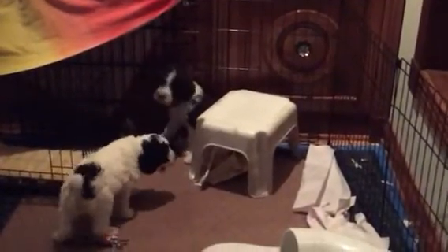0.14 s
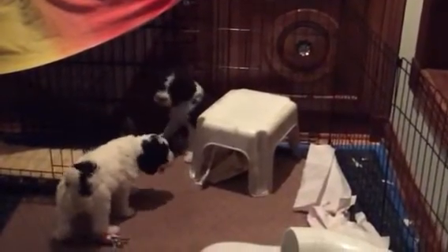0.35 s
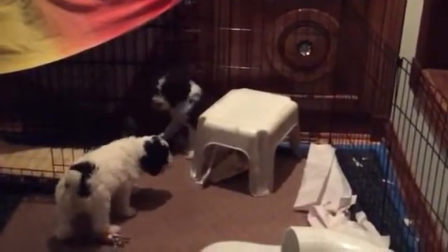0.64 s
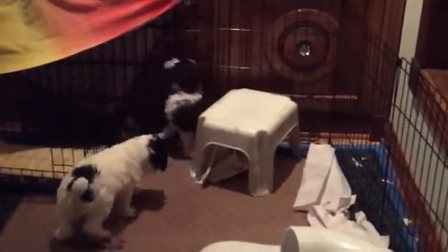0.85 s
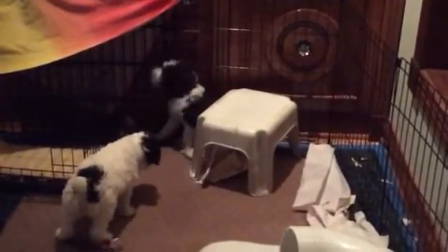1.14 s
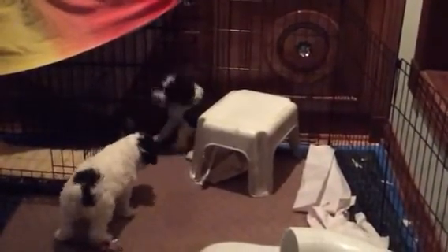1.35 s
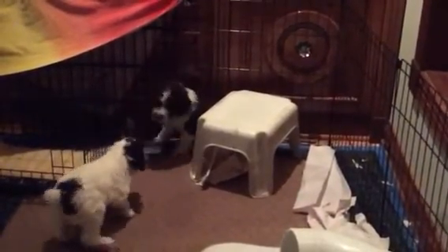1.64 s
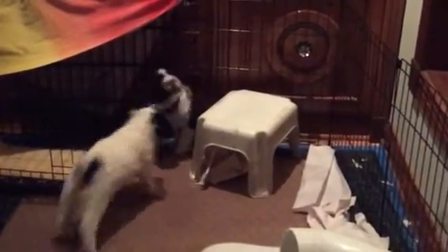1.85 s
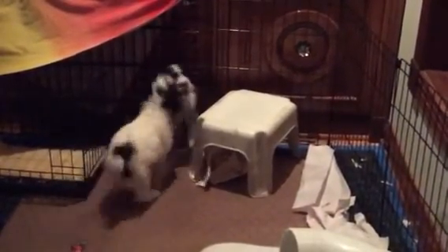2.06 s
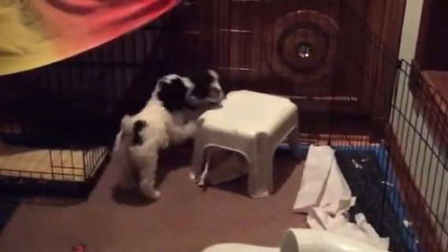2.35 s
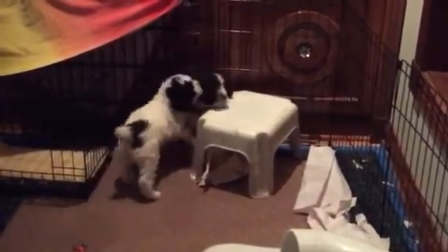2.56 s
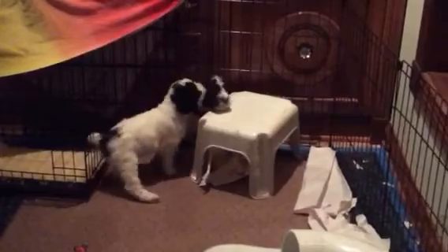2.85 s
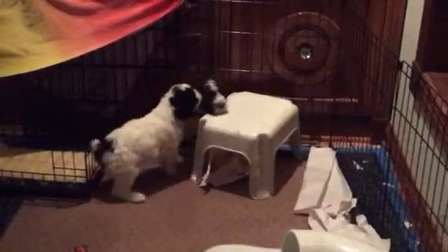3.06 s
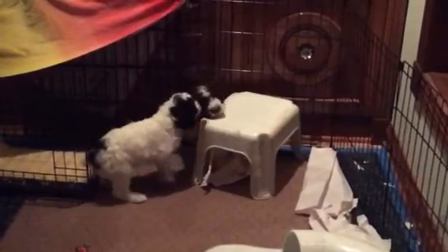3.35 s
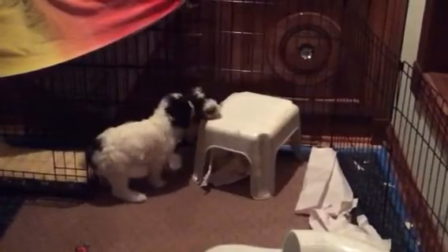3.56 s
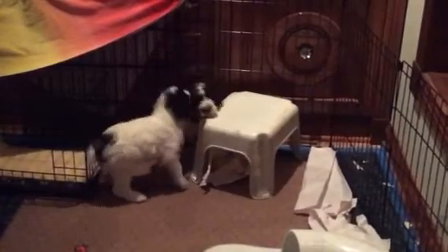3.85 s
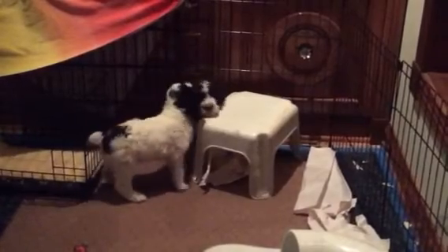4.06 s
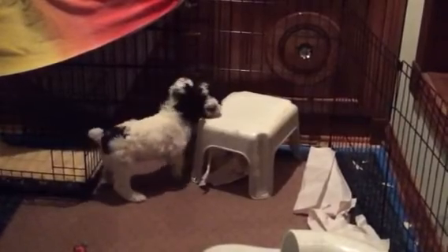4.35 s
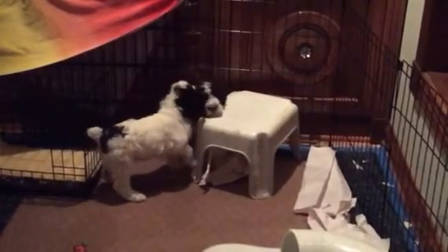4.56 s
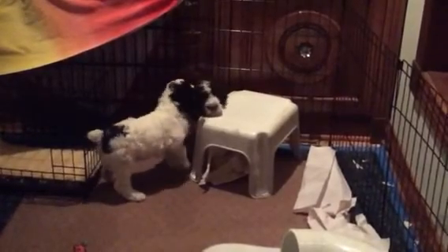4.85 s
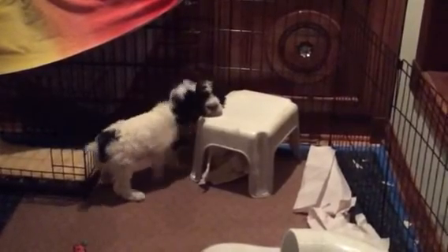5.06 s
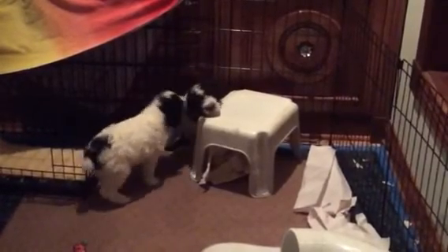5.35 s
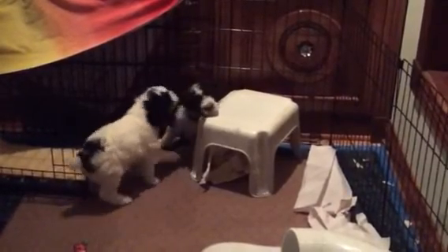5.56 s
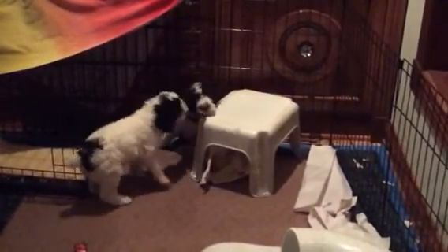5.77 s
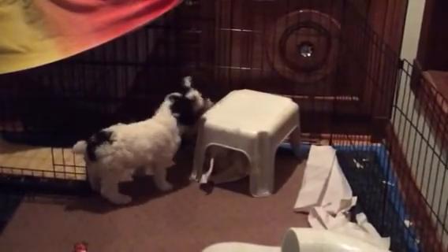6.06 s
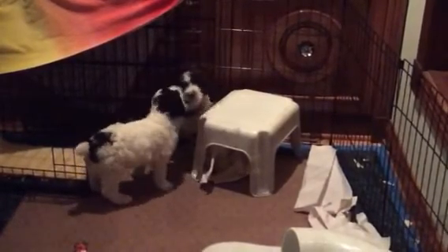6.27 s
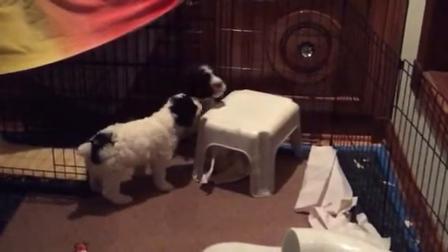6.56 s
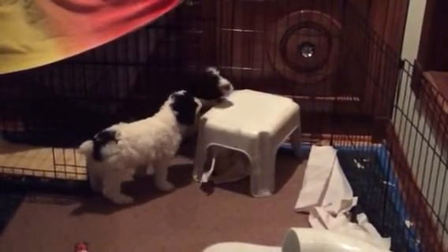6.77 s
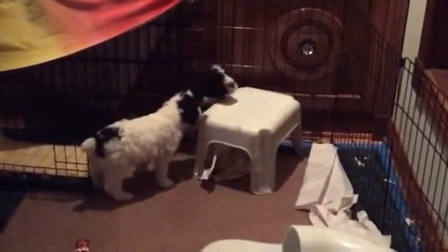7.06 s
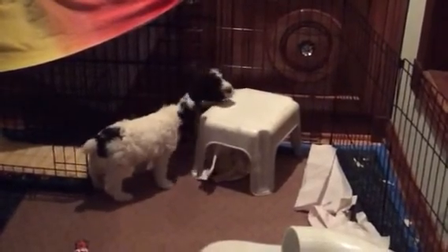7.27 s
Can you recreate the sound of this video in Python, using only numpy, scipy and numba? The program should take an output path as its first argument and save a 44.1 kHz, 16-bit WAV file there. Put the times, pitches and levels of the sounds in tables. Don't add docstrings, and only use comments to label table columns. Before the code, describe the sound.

A puppy gives one rough falling yap, then a short hoarse bark, followed by low fluttering grunts, claw ticks and rustling paws in a small room.

```python
import sys
import numpy as np
from scipy import signal
from scipy.fft import rfft, irfft
from scipy.io import wavfile
from scipy.ndimage import uniform_filter1d
from numba import njit

SR = 44100
rng = np.random.default_rng(int(sys.argv[2]) if len(sys.argv) > 2 else 0)


def nominal_scale(level):
    x = np.asarray(level, float) / 20
    return 10 ** x


def wrap_up_sound(samples):
    columns = np.atleast_2d(samples).T
    tamed = np.clip(columns, -1, 1)
    steps = np.round(tamed * 32767).astype(np.int16)
    wavfile.write(sys.argv[1], SR, steps)


N = 327206
T = np.arange(N) / SR


def unit(x):
    return x / np.sqrt(np.mean(x ** 2))


@njit
def svf(x, hz, width):
    y, band_state, low_state = np.empty(len(x)), 0., 0.
    for i in range(len(x)):
        g, k = np.tan(np.pi * hz[i] / SR), width / hz[i]
        v = (band_state + g * (x[i] - low_state)) / (1 + g * (g + k))
        band_state = 2 * v - band_state
        low_state += 2 * g * v
        y[i] = k * v
    return y


def band(x, hz, width):
    hz = hz + np.zeros(N)
    return svf(svf(x, hz, 1.5 * width), hz, 1.5 * width)


def tract(x, modes):
    total = np.zeros(N)
    for k, (hz, width, db) in enumerate(modes):
        total = total + (-1) ** k * nominal_scale(db) * band(x, hz, width)
    return unit(total)


def walk(rate):
    k = int(SR / rate)
    steps = np.repeat(rng.standard_normal(N // k + 1), k)
    return 2.1 * uniform_filter1d(uniform_filter1d(steps, k), k)[:N]


@njit
def folds(hz, jitter, shimmer, chance):
    pulses, phase, p, k = np.zeros(len(hz) + 1), np.empty(len(hz)), 0., 0
    for i in range(len(hz)):
        step = hz[i] * np.exp(jitter[i] * chance[k, 0]) / SR
        p += step
        if p >= 1:
            p, k = p - 1, k + 1
            size = np.exp(shimmer[i] * chance[k, 1]) / np.sqrt(step)
            pulses[i] += size * p / step
            pulses[i + 1] += size * (1 - p / step)
        phase[i] = p
    return pulses[:-1], phase


def pushes(s, hold, db, rise_db_s, sag_db_s, fall_db_s):
    age = T - s
    rise_db = rise_db_s * np.maximum(-age, 0)
    sag_db = sag_db_s * np.clip(age, 0, hold)
    fall_db = fall_db_s * np.maximum(age - hold, 0)
    return nominal_scale(db - np.minimum(rise_db + sag_db + fall_db, 120)), age


# f/Hz, level/dB
HUM = [(120, -90.5), (240, -77.5), (1200, -87.5), (1680, -89.5), (1920, -103.5), (2160, -92.5),
       (2400, -101.5), (3600, -97.5)]
# f/Hz, density/dB per Hz
AIR = [(15, -54.5), (25, -13), (75, -2.5), (183, 3), (209, -17), (233, -7), (267, -18), (368, -7),
       (826, -15), (1240, -19.5), (2300, -30.5), (3930, -23), (5280, -35), (9550, -22), (15500, -27)]


def air():
    hz, db = np.transpose(AIR)
    bins = np.arange(N // 2 + 1) * SR / N + 1
    colour = nominal_scale(np.interp(np.log(bins), np.log(hz), db))
    noise = irfft(rfft(rng.standard_normal(N)) * colour, N)
    flicker_db = .6 * walk(8)
    hum = sum(np.sqrt(2) * nominal_scale(line_db) * np.sin(2 * np.pi * f * T) for f, line_db in HUM)
    return unit(noise) * nominal_scale(-71.5 + flicker_db) + hum


# start t/s, length/s, f/Hz, level/dB, width/Hz
WHINES = [(-.04, 0.088, 2060, -65, 150), (.55, .08, 5500, -80, 400), (.55, .07, 6800, -82, 500),
          (0.751, 0.038, 3030, -42.5, 350), (1.37, 0.07, 1760, -71, 130), (1.43, .04, 1760, -76, 130),
          (1.54, 0.065, 1804, -75, 120), (3.261, 0.049, 2080, -68.5, 220), (3.33, .1, 1450, -73, 300),
          (3.46, .08, 3300, -73, 300), (3.63, .05, 1750, -69, 250), (3.71, .05, 1400, -72, 250),
          (3.77, .06, 1700, -74, 200), (4.31, .06, 290, -67, 60), (4.94, 0.087, 1000, -66.5, 219),
          (4.992, 0.14, 900, -70, 130), (5.382, 0.18, 996, -68, 50), (5.7, .07, 1250, -68, 400),
          (5.982, 0.16, 925, -72, 45), (6.099, 0.12, 2040, -65.5, 221), (6.14, 0.049, 1720, -73, 150),
          (6.26, .07, 1200, -72, 120)]


def whines():
    pure_hz = 75
    noise = rng.standard_normal(N)
    waver = 2 * np.pi * np.cumsum(1 + .012 * walk(25)) / SR
    out = np.zeros(N)
    for s, length, hz, db, width in WHINES:
        swell = np.sin(np.pi * np.clip((T - s) / length, 0, 1)) ** 0.95
        pure = np.clip(1 - width / pure_hz, 0, .9)
        tone = pure * np.sqrt(2) * np.sin(hz * waver)
        breath = np.sqrt(1 - pure ** 2) * tract(noise, [(hz, width, 0)])
        out += nominal_scale(db) * swell * (tone + breath)
    return out


# loudest t/s, swell/s and fade/s for 20 dB, hiss level/dB, rasp against hiss/dB
SCUFFS = [(.005, .05, 0.052, -82, 20), (.552, .01, 0.16, -74, -14), (.835, 0.059, 0.42, -59, 0),
          (1.06, .04, 0.12, -59.5, -1), (1.32, 0.39, 0.27, -76.5, 2), (1.56, 0.16, 0.13, -78.5, 0.5),
          (1.82, 0.23, 0.17, -70, 0), (1.905, 0.15, 0.13, -63, 6), (2.016, 0.14, 0.22, -58, 3),
          (2.099, 0.19, 0.07, -60.5, 5), (2.184, 0.021, 0.043, -54, 6), (2.244, 0.013, .05, -52, -5),
          (2.419, 0.071, 0.13, -58, 6), (2.771, 0.16, 0.21, -73, 4), (3.049, 0.12, 0.38, -80, 9.5),
          (3.52, 0.22, 0.37, -80.5, 7), (3.931, 0.28, 0.33, -81.5, 6.5), (5.41, 0.4, 0.34, -86, 10),
          (5.819, 0.27, .3, -69, 1), (5.97, 0.36, 0.18, -66, 0.5), (6.16, 0.048, 0.11, -81, 13),
          (6.49, 0.23, 0.17, -72.5, 1.5), (6.69, 0.023, 0.11, -70, -4), (6.88, 0.67, 0.55, -77, 2),
          (7.361, 0.27, 0.53, -71, 3)]
# heaviest t/s, swell and fade/s for 20 dB, level/dB
SHIFTS = [(.45, 7, -87), (1.15, 0.1, -69.5), (1.75, 1.8, -80.5), (2.62, 1.1, -79), (3.4, -0.5, -73),
          (3.9, 0.74, -70.5), (4.4, 1.5, -82.5), (4.7, 1.1, -72.5), (5.25, 1.5, -74), (5.5, -0.2, -69),
          (5.731, 0.14, -67.5), (6.3, 0.5, -74), (6.65, 1, -74), (7.0, 0.9, -71)]


def scuffing():
    rest_hiss_db, rest_rasp_db, rest_weight_db = -88, -80.5, -84.5
    weight_db = -14
    s, swell, fade, db, rasp_db = np.array(SCUFFS, float).T[:, :, None]
    rise_db_s, fall_db_s = 20 / np.maximum(swell, .005), 20 / np.maximum(fade, .005)
    gain = pushes(s, 0 * s, db, rise_db_s, 0 * s, fall_db_s)[0]
    rub = np.max(gain * nominal_scale(rasp_db), axis=0)
    grains = rng.standard_normal(N) * nominal_scale(1.5 * rng.exponential(size=N) + .9 * walk(60))
    fur = tract(grains, [(7020, 9100, -21), (10160, 3900, 12.5), (12750, 12000, 8.5)])
    mat = tract(grains, [(1404, 2290, -2.3), (2600, 3020, 2), (3960, 4710, -2)])
    hiss = (gain.max(axis=0) + nominal_scale(rest_hiss_db)) * fur
    rasp = (rub + nominal_scale(rest_rasp_db)) * mat

    s, span, db = np.array(SHIFTS, float).T[:, :, None]
    slope = 20 / np.maximum(span, .02)
    shifting = pushes(s, 0 * s, db, slope, 0 * s, slope)[0].max(axis=0)
    load = nominal_scale(weight_db) * rub + nominal_scale(rest_weight_db) + shifting
    bedding = tract(rng.standard_normal(N), [(223.0, 130, 9.0), (484.0, 200, -6.0), (900, 390, 0.0)])
    weight = load * nominal_scale(2 * walk(30)) * bedding
    return hiss + rasp + weight


# full at t/s, chest level/dB, chest f/Hz, mouth level/dB, nose level/dB
HUFFS = [(.015, -64, 174.2, -21, -19), (2.738, -61.5, 183.8, -12, -28), (3.31, -63, 192.8, -9, -17),
         (3.815, -62, 190.1, -20, -10), (4.35, -68, 189.6, -10, -9), (2.238, -55, 169.9, -29.5, -21),
         (4.278, -60, 185.1, -14, -9), (4.545, -61, 189, -24, -4.5), (4.838, -57.5, 157.9, -22.5, -4),
         (5.125, -58, 173.5, -32, -5.5), (5.662, -57, 167.1, -10.5, -15), (6.135, -65.5, 178.6, -7, -8),
         (6.53, -48, 184.7, -14, -7), (6.6, -63.5, 189.8, -20, -7), (5.47, -63, 187, -13.5, -8),
         (2.555, -59.5, 183.7, -15, -8)]
# full at t/s, hold/s, chest level/dB, chest f/Hz, mouth level/dB
GRUNTS = [(2.092, .02, -49, 153.1, -9), (2.403, .022, -43, 185.1, -4.5), (2.434, .02, -47, 169.9, 6.5),
          (2.47, 0.023, -42, 187.9, -3), (2.506, 0.01996, -48, 183.9, -17), (2.997, .025, -47, 164.2, -16),
          (3.03, .035, -44.5, 172.1, -4.5), (3.071, .09, -41.5, 183.3, -12.5),
          (3.185, .075, -50, 191.7, -14.5), (3.49, .05, -42, 177, -14.5), (3.562, .085, -48, 175.2, -14.5),
          (4.023, .01, -60, 190.2, -14), (4.055, .01, -54, 165, -30), (4.078, .02, -45.5, 165.9, -32),
          (4.112, .02, -53, 155, -30), (4.14, .03, -51, 163.5, -29), (4.176, .055, -47.5, 175.7, -15.5),
          (4.257, .02, -60, 174.7, -15.5), (5.312, .01, -58, 187.5, -16.5), (5.34, .018, -44, 180.2, -16),
          (5.365, .032, -42, 180.1, -10.5), (5.408, .015, -48, 182.4, -13),
          (6.402, .045, -48, 160.4, -10.5), (6.459, .04, -47, 168.3, -10.5), (6.505, .03, -43, 176, -16),
          (7.409, .03, -37.5, 174.6, -14.5)]
# t/s, f/Hz, level against the chest tone/dB, nose opening/dB
SIDES = [(2.1, 224.5, -6, 0.5), (2.42, 244.5, -4.5, -3.5), (2.49, 245, -5, 2.5), (3.0, 222, -7.5, -5),
         (3.16, 236.7, -4.5, -4.5), (3.22, 250.6, -2.5, 2), (3.5, 233.9, -9.5, -0.5), (3.63, 239.9, -1, -1),
         (4.07, 239, -8.5, 4), (4.14, 235.9, -8.5, -1), (4.2, 225.6, -7.5, 1.5), (5.34, 234.1, -3.5, -8),
         (5.42, 235.1, -6.5, -1), (6.4, 227, -4.5, -2), (6.46, 249.8, -1.3, -0.5), (6.541, 251.7, -4.5, 3),
         (7.4, 238.8, -11, -5.5)]
# f/Hz, width/Hz, level/dB
NOSE = [(294, 90, 6), (427, 80, 3), (534, 40, 7), (606, 80, 3), (790, 130, -6)]
# f/Hz, width/Hz, level/dB
SHUT_MOUTH = [(1035, 140, 1.5), (1290, 190, -0.65), (1550, 300, -10.5), (1920, 170, -14),
              (2360, 400, -21.5), (3400, 530, -25.5)]


def grunts():
    huff_s, glide_hz_s = .02, 39.81
    rise_db_s, sag_db_s, fall_db_s = 600, 10.5, 750
    nose_db, nose_share, nose_rise_db_s = -8, 0.53, 54.5
    lips_lag_db_s, round_s = 199.5, 0.021
    rows = [(*row, nose_db + nose_share * row[-1]) for row in GRUNTS]
    rows += [(s, huff_s, *rest) for s, *rest in HUFFS]
    s, hold, db, hz, lips_db, nostril_db = np.array(rows, float).T[:, :, None]
    gain, age = pushes(s, hold, db, rise_db_s, sag_db_s, fall_db_s)
    age = np.clip(age, -.03, hold + .04)

    def loudest(part_db):
        return uniform_filter1d(np.max(gain * nominal_scale(part_db), axis=0), int(round_s * SR))

    push_hz = hz + glide_hz_s * (age - hold / 2)
    chest_hz = np.sum(gain * push_hz, axis=0) / gain.sum(axis=0)
    side_s, *columns = np.transpose(SIDES)
    side_hz, side_db, open_db = (np.interp(T, side_s, c) for c in columns)

    steady = np.ones(N)
    flap_hz = np.clip(side_hz - chest_hz, 45, 95)
    pulses, phase = folds(flap_hz, .07 * steady, .2 * steady, rng.standard_normal((N // 100, 2)))
    flaps = unit(pulses)
    breath = unit(np.exp(-phase / .55) * rng.standard_normal(N))

    turn = 2 * np.pi * np.cumsum(chest_hz * (1 + .024 * walk(110))) / SR
    flap_turn = 2 * np.pi * phase
    chest = nominal_scale(1.3 * walk(50)) * np.sin(turn) + nominal_scale(-24) * np.sin(turn - flap_turn)
    side = nominal_scale(side_db + 1.8 * walk(50)) * np.sin(turn + flap_turn)
    nose_gain = nominal_scale(open_db) * loudest(nostril_db + nose_rise_db_s * age)
    nose = nose_gain * tract(flaps + 1.3 * breath, NOSE)
    mouth_gain = loudest(lips_db + lips_lag_db_s * np.minimum(age, 0))
    mouth = mouth_gain * tract(flaps + 1.6 * breath, SHUT_MOUTH)
    return np.sqrt(2) * loudest(0) * (chest + side) + nose + mouth


# t/s, peak level/dB, ring f/Hz, t60/s, crack level/dB
TICKS = [(0.551, -83, 1150, 0.07, -4), (1.764, -58, 3000, .04, -8), (1.807, -51.5, 2200, 0.056, -10),
         (1.888, -46.5, 3200, 0.076, -17), (2.1, -48, 2730, 0.091, -13.5), (2.009, -60.5, 930, 0.069, -3),
         (2.182, -38, 1000, 0.056, -10), (2.396, -41.5, 8800, 0.052, -9), (2.437, -43, 840, 0.046, -35),
         (3.048, -46, 1400, 0.048, -35), (3.972, -54.5, 1840, 0.05, -30), (3.6, -58, 950, 0.06, -30),
         (3.974, -57, 3600, 0.05, -15), (2.797, -51, 1700, 0.042, -23), (3.767, -58, 840, 0.15, -28),
         (3.767, -62, 2700, 0.11, -30), (3.88, -57, 640, .15, -30), (4.951, -59, 840, .06, -30),
         (3.912, -59, 2500, 0.071, -30), (5.855, -55, 3200, 0.04, -30), (5.855, -60, 2150, 0.04, -30),
         (5.712, -59, 1030, 0.13, -30), (5.968, -55.5, 3500, 0.09, -29), (5.854, -51, 1260, 0.051, -21),
         (6.687, -53, 4400, 0.042, -30), (6.69, -60, 3800, 0.09, -30), (6.676, -64, 11000, 0.032, -5),
         (5.6, -61.5, 940, 0.087, -29)]
# t/s, level/dB (played 9.5 dB lower)
SNAPS = [(0.5523, -39), (0.902, -29), (1.041, -31.5), (1.806, -40), (5.6553, -61)]
# t/s, peak level/dB, floor f/Hz
THUMPS = [(1.691, -57, 84), (1.929, -64.5, 67.6), (2.728, -59, 128.4), (4.527, -55, 126.8),
          (5.659, -55.5, 128), (6.299, -65.5, 79.2)]


def contacts():
    out, t = np.zeros(N + SR), np.arange(SR // 5) / SR
    rows = TICKS + [(s, db - 9.5, 9500, .05, 2.5) for s, db in SNAPS]
    rows = rows + [(s, db, hz, .18, -60) for s, db, hz in THUMPS]
    noise = rng.standard_normal((len(rows), 2, len(t)))
    for (s, db, hz, t60, crack_db), (rub, snap) in zip(rows, noise):
        attack = np.minimum(t / (0.00033 + .5 / hz), 1)
        decay = attack * np.exp(-np.log(1000) * t / max(t60, .01))
        centre = hz + 0 * t
        ring = unit(svf(svf(rub, centre, 0.38 * hz), centre, 0.38 * hz))
        crack = unit(np.diff(snap, prepend=0))
        hit = decay * (ring + nominal_scale(crack_db) * crack)
        out[int(s * SR):][:len(t)] += 0.87 * nominal_scale(db) * hit / np.abs(hit).max()
    return out[:N]


# t/s, level/dB, fold f/Hz, mouth opening/0-1
YAP = [(.728, -73.5, 371.2, 0.13), (.748, -41.5, 377.5, 0.5), (.764, -36, 437.6, 1.),
       (.79, -33.5, 425.3, 0.98), (.826, -31.5, 365.9, 0.63), (.865, -36.5, 326.1, 0.54),
       (.93, -38, 300.8, 0.36), (.995, -39.5, 282, 0.44), (1.1, -66, 256.6, 0.01)]
# t/s, level/dB, fold f/Hz, mouth opening/0-1
BARK = [(2.232, -65.5, 210.7, 0.08), (2.243, -37.5, 214.6, .5), (2.258, -27.5, 216.3, 0.61),
        (2.277, -22, 218.5, 0.72), (2.302, -37, 212.6, 0.36), (2.33, -36.5, 208.9, 0.55),
        (2.357, -42, 217.3, 0.88), (2.393, -49, 213, .5), (2.42, -55, 220.5, .4)]
# t/s, share/0-1
ROUGH = [
    [(.75, .65), (.775, .55), (.81, .42), (.835, .42), (.87, .7), (1.0, .72), (1.05, .85)],
    [(2.25, .8), (2.3, .65), (2.4, .7)],
]
# upper throat level/dB, low partials with the mouth shut/dB, breath hiss at full effort/dB,
# hiss change as effort drops/dB per dB, upper throat lost likewise/dB per dB
VOICES = [
    (-4.5, 10, -34.5, 0.61, 0.33),
    (-9.5, 5, -28, 0.27, .55),
]
# f/Hz, width/Hz, level/dB
MOUTH = [
    [(1106, 184, 6), (1486, 184, 12), (2037, 150, 8)],
    [(984, 120, -14.5), (1456, 260, -3), (1680, 290, -8.5), (2080, 210, -14)],
]
# f/Hz, width/Hz, level/dB
UPPER_THROAT = [
    [(2640, 190, -5), (3254, 150, 2), (3784, 245, 7), (4330, 210, -4.5), (4770, 580, -14.5)],
    [(2350, 300, -7), (2720, 340, 1), (3220, 230, 0.5), (3910, 300, 4.5), (4350, 430, 0), (4740, 300, 2),
     (5490, 350, -14), (6300, 450, -28)],
]
# f/Hz, width/Hz, level/dB
LOW_THROAT = [
    [(213, 39, -3), (348, 127, -2), (552, 120, -3), (712, 88, -4.5)],
    [(303, 97, -6), (425, 89, -11.5), (655, 92, -6)],
]
# multiple of the fold rate, level against the rough low partials/dB,
# octave against it/dB, mouth shift/per unit of opening
CLEAR = [
    (1, 1, -8.5, 0.062),
    (1.5, -15.5, -0.5, 0.11),
]
# f/Hz, width/Hz, level/dB
HISS = [
    [(9400, 4000, -1), (12500, 8500, 3)],
    [(9100, 2200, -6.5), (12370, 5100, 1)],
]


def bark(call, rough, kind, mouth, upper, low, clear, breathy):
    open_low_db, open_upper_db = -27.5, -0.5
    full_db, jaw_wobble = -33, .015
    clear_escape = 0.21
    s, *columns = np.transpose(call)
    db, hz, opening = (np.interp(T, s, c) for c in columns)
    gate = uniform_filter1d(1. * ((T > s[0]) & (T < s[-1])), SR // 200)
    upper_db, low_db, hiss_db, hiss_lag, upper_lag = kind
    multiple, clear_db, octave_db, shift = clear

    moving_mouth = []
    for f, width, gain_db in mouth:
        jaw = 1 + shift * (opening - .6) + jaw_wobble * walk(40)
        moving_mouth.append((f * jaw, width, gain_db))
    rough = np.interp(T, *np.transpose(rough))
    weak_db = np.clip(full_db - db, -10, 40)
    upper_db = upper_db + open_upper_db * opening - upper_lag * weak_db
    low_db = low_db + open_low_db * opening
    hiss_db = hiss_db + hiss_lag * weak_db

    uneven = np.tile([[0, 1.2], [0, -1.2]], (N // 100, 1))
    chance = rng.standard_normal((N // 100 * 2, 2)) + uneven
    pulses, phase = folds(hz, .06 * rough, .22 * rough, chance)
    breath = unit(np.exp(-phase / .5) * rng.standard_normal(N))
    source = np.sqrt(1 - rough ** 2) * unit(pulses) + rough * breath

    turn = 2 * np.pi * np.cumsum(multiple * hz) / SR
    escape_db = clear_escape * open_low_db * (opening - 0.63)
    fading_db = .5 * np.minimum(db + 39.5, 0)
    clear_gain = nominal_scale(clear_db - escape_db + 0.76 * walk(40) + fading_db)
    clear_tone = clear_gain * (np.sin(turn) + nominal_scale(octave_db) * np.sin(2 * turn))
    below = nominal_scale(low_db) * (clear_tone + 0.73 * tract(source + 1.1 * breath, low))
    above = nominal_scale(upper_db) * tract(source + .7 * breath, upper)
    hiss = nominal_scale(hiss_db) * tract(breath + .8 * rng.standard_normal(N), breathy)
    voice = gate * nominal_scale(db) * (tract(source, moving_mouth) + below + above + hiss)
    return signal.sosfilt(signal.butter(4, 130, "high", fs=SR, output="sos"), voice)


# delay t/s, level/dB
ECHOES = [(.0017, -12.5), (.0031, -16), (.0048, -15), (.0073, -12.5), (.0102, -13.5), (.0139, -9.5)]


def near_echoes(voices):
    mids = signal.sosfilt(signal.butter(2, [500, 6000], "band", fs=SR, output="sos"), voices)
    out = np.zeros(N)
    for k, (s, db) in enumerate(ECHOES):
        out += (-1) ** k * nominal_scale(db) * np.pad(mids, (int(s * SR), 0))[:N]
    return out


@njit
def walls(x, lags, gain, damp):
    line, soft, out = np.zeros((8, 4096)), np.zeros(8), np.zeros(len(x))
    for i in range(len(x)):
        total = 0.
        for k in range(8):
            soft[k] += (1 - damp) * (gain[k] * line[k, (i - lags[k]) & 4095] - soft[k])
            total += soft[k]
        for k in range(8):
            line[k, i & 4095] = x[i] + soft[k] - total / 4
        out[i] = soft[0] - soft[3] + soft[5] - soft[6]
    return out


def room(pen):
    t60_s, level_db, damp = 0.47, -16.5, .3
    lags = np.array([411, 563, 727, 919, 1123, 1361, 1597, 1873])
    return nominal_scale(level_db) * walls(pen + 1e-18, lags, nominal_scale(-60 * lags / SR / t60_s), damp)


def scene():
    calls = map(bark, (YAP, BARK), ROUGH, VOICES, MOUTH, UPPER_THROAT, LOW_THROAT, CLEAR, HISS)
    voices = sum(calls) + grunts() + whines()
    pen = voices + contacts() + scuffing()
    return (pen + near_echoes(voices) + room(pen) + air())[None]


def roll_off(x):
    return signal.sosfilt(signal.butter(12, 15660, fs=SR, output="sos"), x)


def record(dry):
    thin = signal.sosfilt(signal.butter(2, 45, "high", fs=SR, output="sos"), dry)
    thin = signal.sosfilt(signal.ellip(10, .2, 60, 15330, fs=SR, output="sos"), thin)
    return roll_off(thin)


dry = scene()
out = record(dry)
wrap_up_sound(out)
```